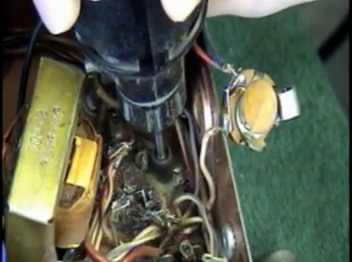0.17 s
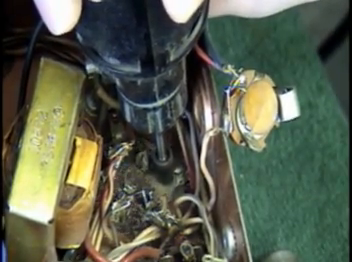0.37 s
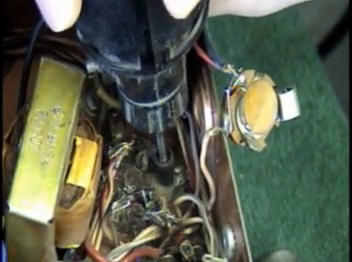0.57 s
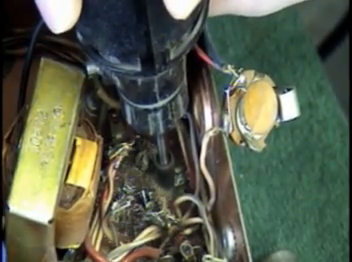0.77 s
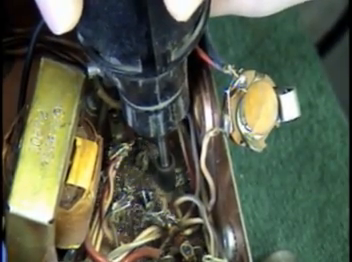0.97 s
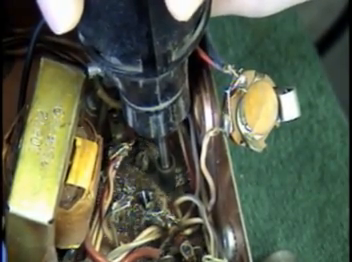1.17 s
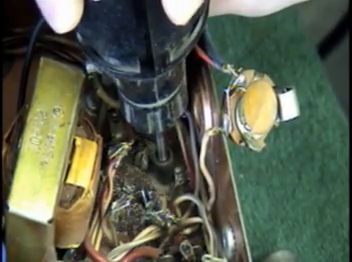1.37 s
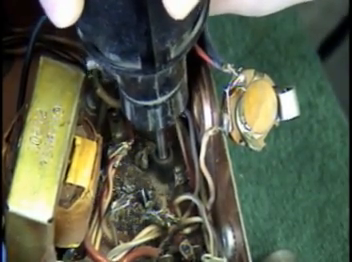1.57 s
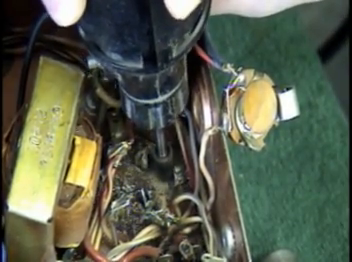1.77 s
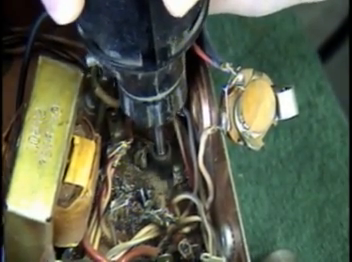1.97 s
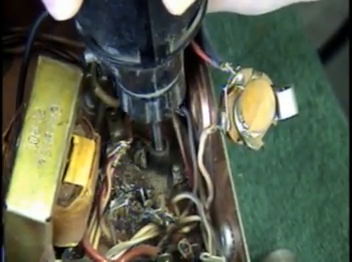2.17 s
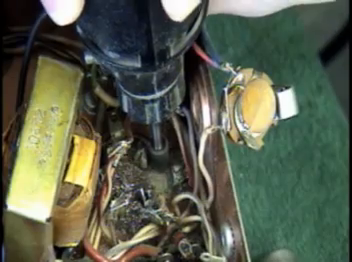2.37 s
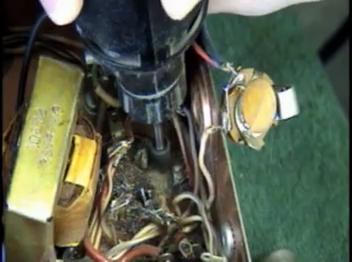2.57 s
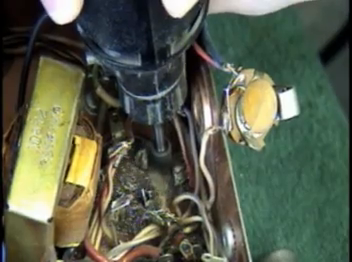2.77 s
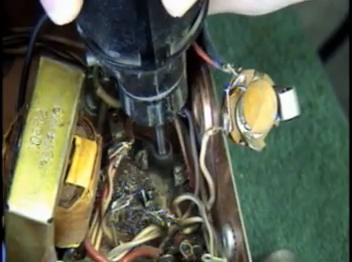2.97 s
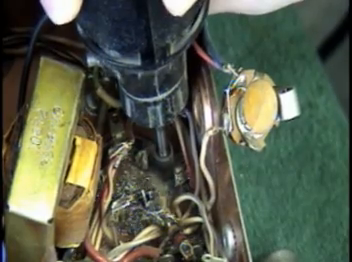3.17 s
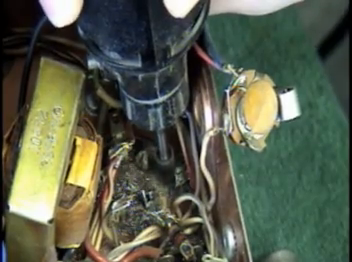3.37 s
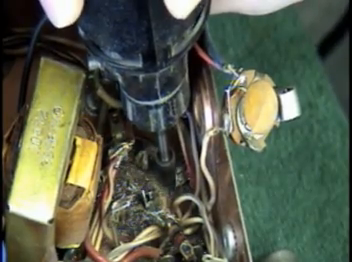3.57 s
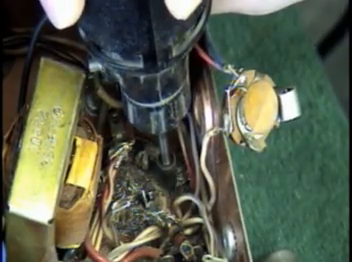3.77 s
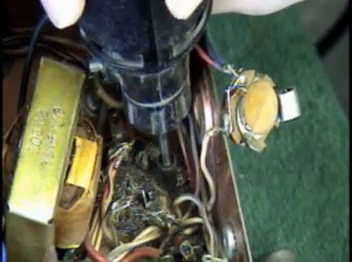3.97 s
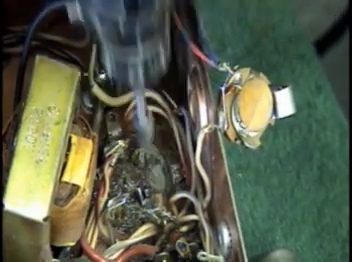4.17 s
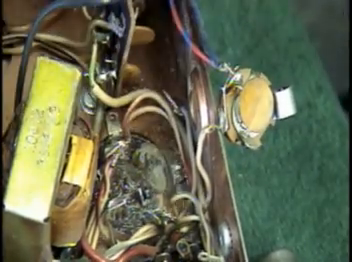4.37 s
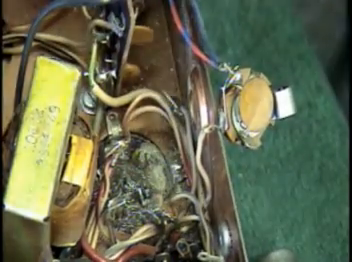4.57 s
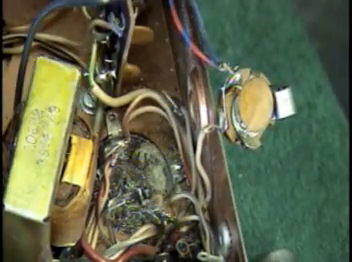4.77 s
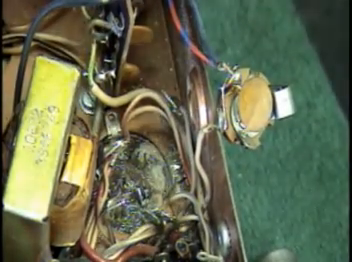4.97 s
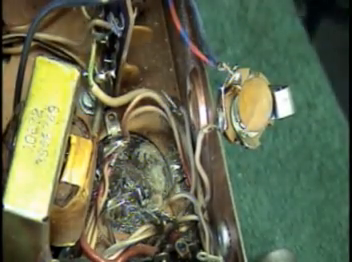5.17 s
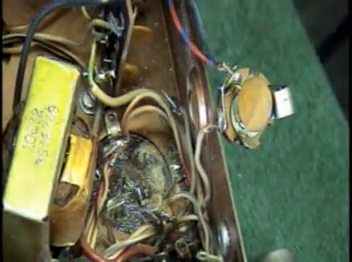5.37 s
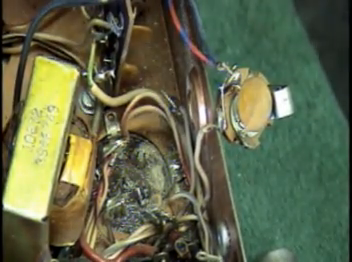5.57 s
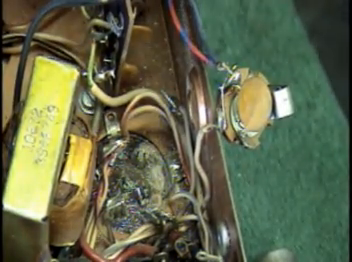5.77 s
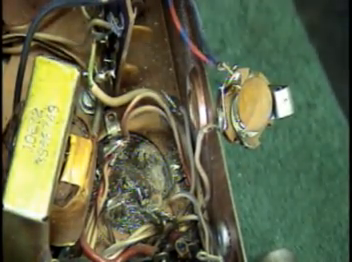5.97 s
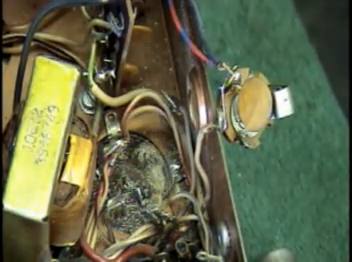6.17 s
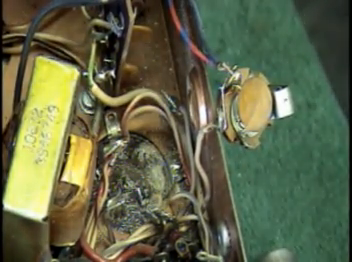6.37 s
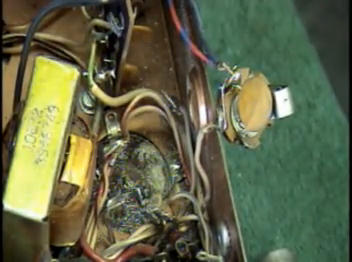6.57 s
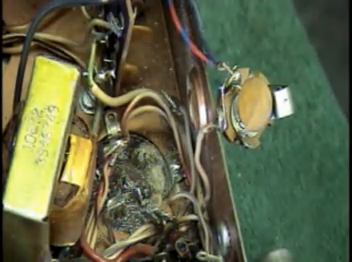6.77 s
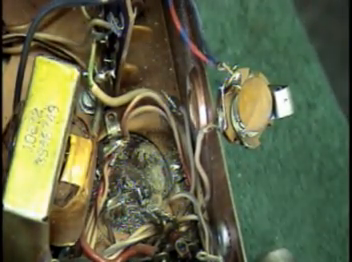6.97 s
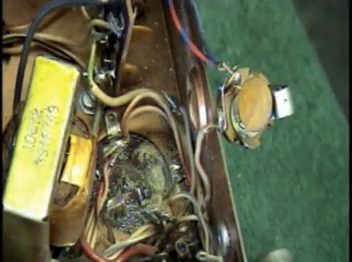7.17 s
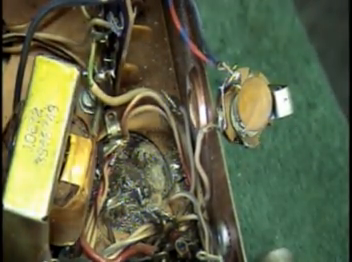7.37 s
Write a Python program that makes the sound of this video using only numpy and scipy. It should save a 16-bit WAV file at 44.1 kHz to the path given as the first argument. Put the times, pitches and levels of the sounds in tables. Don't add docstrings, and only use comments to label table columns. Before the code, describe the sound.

A handheld rotary tool grinds and buzzes against ringing metal, lifts off into a high free whine, runs down, and is laid on a bench with knocks.

```python
import sys
import numpy as np
from scipy import signal
from scipy.fft import rfft, irfft, next_fast_len
from scipy.io import wavfile
from scipy.ndimage import uniform_filter1d

SR = 44100
rng = np.random.default_rng(int(sys.argv[2]) if len(sys.argv) > 2 else 0)


def waveform_to_disk(signal):
    frames = np.transpose(np.atleast_2d(signal))
    scaled = np.clip(frames, -1, 1) * 32767
    samples = np.round(scaled).astype(np.int16)
    wavfile.write(sys.argv[1], SR, samples)


def field_ratio(decibels):
    return 10 ** (np.asarray(decibels, dtype=float) / 20)


N = 326761
T = np.arange(N) / SR

# t/s, turns f/Hz
SHAFT = [(0, 257.3), (.31, 251.4), (.47, 266.7), (.76, 283.2), (1.05, 308.3), (1.27, 316.6), (1.36, 331),
         (1.47, 309), (1.66, 313.1), (1.95, 345.4), (2.24, 352.6), (2.36, 332.1), (2.53, 315.8),
         (2.66, 289), (2.81, 274.8), (2.98, 285), (3.35, 282.3), (4.1, 313.2)]
LIFT_S, FREE_HZ, SPIN_UP_S = 4.125, 389.6, 0.078
OFF_S, BALANCE_HZ, BRAKE_PER_S = 4.81, 416.5, 0.4356

# t/s, pressure level/dB, dig of the flutes over the grit/dB, evenness of bite/dB, side load/dB
CUT = [(0, -26.5, -4, -0.5, -8), (.3, -27, -5, 0, 6), (.6, -27, -3, 0.5, -4), (.85, -28, -2, 3, -4),
       (1.15, -28.5, 0.5, -0.5, -2), (1.38, -28.5, 1, -1.5, 5), (1.55, -27.5, -11, 3, -10),
       (1.75, -29.5, -7.5, 0, 1.5), (1.92, -31, -4, -1, -7), (2.1, -31, -1, -1, 4),
       (2.35, -29.5, 4, -1, 4.5), (2.55, -27.5, 4, -3.5, 14), (2.72, -27, 0, 0.5, 8),
       (2.95, -27.5, -5.5, 1.5, 4.5), (3.35, -27, -6.5, 0.5, -0.5), (3.75, -28, -3, 3, -11),
       (4.0, -29, 3.5, -8.5, 1.5), (4.15, -35.5, 9.5, -8.5, 0)]
# t/s, strength level/dB, length/s
GRABS = [(1.035, -15, 0.022), (1.159, -15, 0.02), (1.365, -7.5, 0.032), (1.419, -11, 0.028),
         (1.949, -6.5, 0.028), (2.043, -7.5, 0.029), (2.52, -7, 0.0053), (2.576, -10.5, 0.0079),
         (2.665, -8.5, 0.0064), (3.833, -14, 0.0064), (3.9, -14, 0.018), (3.952, -7.5, 0.019),
         (4.025, -8, 0.031), (4.08, -10, 0.027), (4.138, -32, 0.021)]
# f/Hz, level per Hz/dB
CHASSIS = [(88, -66), (150, -29), (216, -56), (318, -34), (477, -33), (556, -24.5), (786, -22),
           (849, -13.5), (1940, -5.5), (3150, -1), (4200, -4), (7490, 6.5), (8090, 1.5), (13100, 1.5),
           (15000, -8.5)]
# f/Hz, width/Hz, level/dB
RINGS = [(1940, 130, -2.5), (2562, 40, -4), (3113, 48, -5.5), (4966, 690, 0.5), (6660, 18, 2.5),
         (7530, 50, 2), (9020, 49, 7), (8770, 36, -17), (12800, 54, -58)]
# order per turn, level/dB
LOBES = [(3, -51.5), (4, -48), (5, -49.5), (7, -45.5)]
# f/Hz, width/Hz, level/dB
PANEL = [(868, 70, 0), (1009, 120, 1), (1140, 57, 8), (1277, 39, 3.5), (1920, 170, 12), (2382, 130, 3),
         (3110, 69, -3), (3537, 81, 2)]
DIG_SHARE, DRUM_DB, DRUM_SHARE, EVEN_SHARE = 0.69, -9, 0.13, 0.4

# f/Hz, level per Hz/dB
HOUSING = [(180, -70), (300, -37), (365, -13.5), (647, -9), (1040, -6.5), (1490, -4.5), (1970, 0),
           (2360, -1), (3380, 5), (4180, 5.5), (7920, 11.5), (13800, 1.5), (15000, -8)]
# f/Hz, width/Hz, level/dB
CAVITY = [(1105, 149.4, 6.5), (3480, 280, -0.5), (9330, 820, -7)]
# order per turn, level/dB
SPIN = [(3, -12), (8, 8), (9, -8), (11, 3.5), (12, -0.5), (13, 5), (14, -3.5), (16, 8.5), (17, 2), (19, 1),
        (24, -10), (30, 4)]
# t/s, level/dB
RATTLE = [
    (4.2, -3.5),
    (4.8, -2.5),
    (5, 0),
    (5.6, -1),
    (6, -30),
]
# t/s, gain level/dB, left-right/dB
NEAR = [(4.17, -2.5, -1.5), (4.4, 2, -1.5), (4.7, 3, -2.5), (4.95, -0.5, -1.5), (5.2, -2.5, -1),
        (5.5, -2.5, -1.5), (5.9, 3, -2), (6.15, 1.5, -2), (6.4, 7, -3)]
NEAR_SHARE = 0.2
UNBALANCE_DB = -65
# f/Hz, width/Hz, level/dB
GRIP = [(332.3, 29, 10.5), (398, 23.6, 9), (279, 10, -0.5)]
BARS_LOADED_DB, BARS_FREE_DB = -39.5, -35
BARS_FLUTTER_DB, BARS_WEAR_DB, BARS_POWER = 0.8, 11, 4.3
SECOND_DB, SECOND_POWER = -51.5, 0.88
# f/Hz, width/Hz, level/dB
SECOND_RING = [(7790, 90, 13.2)]
HISS_DB, HISS_POWER, HOUSING_DB, HOUSING_POWER = -42, 0.61, -39, 1.77
SQUEAK_DB, SQUEAK_POWER, FIZZ_DB, FIZZ_POWER = -56, -0.39, -12.5, 0.84

# f/Hz, level/dB
DRUM = [(29.97, -67), (59.94, -70), (179.8, -78), (299.7, -80.5), (333, -79)]
# f/Hz, level/dB
HUM = [(119.88, -68), (239.76, -72.5), (359.64, -65.5), (479.5, -74), (719.3, -71.5), (839.2, -84),
       (959, -76), (1139, -79)]
# t/s, level/dB
SHADE = [
    (5.3, 0.5),
    (6.4, 6),
    (6.55, 5.5),
    (7.4, 9),
]
# ticks f/Hz, level/dB
COGS = [(95.785, 0), (95.3, -3)]
# f/Hz, level/dB
WHINE = [(1500, -92), (2900, -82.5), (4250, -89), (4550, -75.5), (4850, -83), (5750, -78), (7200, -77.5),
         (7500, -83), (7780, -69), (8200, -90), (10050, -82), (11000, -89), (13000, -94)]
# f/Hz, level per Hz/dB
FLOOR = [(4.7, -32), (8.0, -29), (118, -4.5), (289, -6), (359, -10.5), (419, -3), (475, -6), (647, -6.5),
         (967, -2), (1800, -11), (4140, -13.5), (7680, -11), (8430, -17), (10200, -17), (13000, -37)]
FLOOR_DB = -55.5

# t/s, peak level/dB, thump level/dB, t60/s, brightness f/Hz
KNOCKS = [
    (5.002, -26.5, -43, .06, 6200),
    (5.329, -37.5, -20, 0.25, 507),
    (5.881, -28.5, -27, 0.19, 800),
    (6.084, -36, -3, 0.16, 493),
    (6.135, -28, -23, 0.061, 2600),
    (6.17, -24.5, -7.5, 0.18, 1850),
    (6.22, -35.5, -16, 0.51, 1260),
    (6.292, -39.5, -1.5, 0.17, 420),
    (6.978, -37.5, -16, 0.25, 1480),
    (7.046, -36.5, -33, 0.033, 1300),
]
# t/s, left-right/dB
BENCH_PAN = [(5.9, 2.5), (7, -3)]
# f/Hz, level/dB, t60/s
BENCH = [(131, -15, .2), (194, 0.5, 0.27), (302, 1, 0.094), (440, -2, 0.2), (517, 3.5, 0.13),
         (660, 1, 0.25)]
# f/Hz, level/dB, t60/s
SHELL = [(1050, -9.5, 0.085), (1850, -5, 0.084), (1890, -10, 0.058), (2424, -7, 0.055), (3730, -6, 0.043)]
# t/s, level/dB, f/Hz, length/s
CREAK = (6.475, -60, 4330, .035)

# f/Hz, left-right/dB
LEAN = [(60, 0.0), (110, 6), (200, -2), (370, 0.5), (690, 1.5), (1270, 2), (2330, 4.5), (4290, -0.5),
        (7900, 1), (14500, 2.5)]
# f/Hz, side over middle/dB
WIDE = [(60, -27), (110, -14), (200, -15), (370, -11), (690, -13), (1270, -10), (2330, -10), (4290, -10.5),
        (7900, -9), (14500, -16)]
# f/Hz, t60/s
SHOP = [(200, 0.15), (2000, 0.24), (10000, 0.47)]
# above f/Hz, needed level/dB
CEILING = [(14550, -32.5), (13900, -45), (13100, -50)]


def unit(x):
    return x / np.sqrt(np.mean(x ** 2) + 1e-20)


def along(points, hz):
    f, v = np.transpose(points)
    return np.interp(np.log(hz + 1), np.log(f + 1), v)


def curves(rows):
    s, *cols = np.transpose(rows)
    return [np.interp(T, s, c) for c in cols]


def wobble(rate, shape=np.asarray):
    knots = shape(rng.standard_normal(int(N * rate / SR) + 4))
    return np.interp(T * rate, np.arange(len(knots)), knots)


def filtered(x, response):
    m = next_fast_len(N + SR // 2)
    return irfft(rfft(x, m) * response(np.fft.rfftfreq(m, 1 / SR)), m)[..., :N]


def split(x, edges_hz):
    lows = [filtered(x, lambda f: 1 / (1 + (f / e) ** 6)) for e in edges_hz]
    return [unit(b) for b in np.diff([0 * x, *lows, x], axis=0)]


def peaks(modes):
    return lambda f: 1 + sum(field_ratio(db) / (1 + (2 * (f - c) / w) ** 2) for c, w, db in modes)


def teeth(turns, first, count, drift, depth_db, favoured=()):
    extra_db = {round(k): db for k, db in favoured}
    phase = (2 * np.pi * (turns % 1)).astype(np.float32)
    total = 0
    for k in range(round(first), count + 1):
        strength = wobble(drift, lambda z: field_ratio(depth_db * z + extra_db.get(k, 0)))
        shift = np.float32(wobble(drift, lambda z: 1.3 * z + k * k))
        total = total + strength * np.sin(k * phase + shift)
    return unit(total)


def shaft():
    loaded, = curves(SHAFT)
    climbing = FREE_HZ - (FREE_HZ - loaded) * np.exp(-np.maximum(T - LIFT_S, 0) / SPIN_UP_S)
    angle = np.arctan(FREE_HZ / BALANCE_HZ) - BRAKE_PER_S * (T - OFF_S)
    coasting = BALANCE_HZ * np.tan(np.maximum(angle, 0.01))
    return np.where(T < OFF_S, climbing, coasting)


def cutter(turns, speed):
    press_db, dig_db, even_db, _ = curves(CUT)
    dig_db = dig_db + 1.9 * wobble(20)
    cut_db, grit_db = press_db + DIG_SHARE * dig_db, -dig_db
    drum_db = DRUM_DB - DRUM_SHARE * dig_db + 2 * wobble(10)
    steady_db = even_db + 0.59 * wobble(8)
    favoured = [(2, 0), (3, -32), (4, 3.5), (5, -0.5), (7, -11.5), (10, -9.5)]  # order, dB
    bite = teeth(turns, 2, count=40, drift=21, depth_db=4.5, favoured=favoured)
    bite = filtered(bite, lambda f: 1 / (1 + (f / 5500) ** 2))
    gate = 1 + 0.1 * np.cos(2 * np.pi * turns) + 0.35 * np.cos(4 * np.pi * turns)
    chips = rng.standard_normal(N) * field_ratio(1.9 * np.minimum(rng.exponential(size=N), 4))
    force = field_ratio(steady_db) * 1.1 * bite + unit(gate * chips) * field_ratio(1.3 * wobble(30))

    grabbed = rng.standard_normal(N) + field_ratio(steady_db) * bite
    for s, db, length in GRABS:
        u = np.arange(SR // 8) / SR / length
        here = slice(round(s * SR), round(s * SR) + len(u))
        force[here] += field_ratio(db + 22.0) * u * np.exp(-u * u * 2) * grabbed[here]
    force /= np.sqrt(uniform_filter1d(force ** 2, size=SR // 3))

    ringing = filtered(force, lambda f: field_ratio(along(CHASSIS, f)) * peaks(RINGS)(f))
    low, mid, high = split(ringing, (1500, 4200))
    lobes = 0
    for k, db in LOBES:
        lobe_db = db + 2.5 + 3.03 * wobble(29.99) + 0.53 * wobble(5.5) + EVEN_SHARE * even_db
        wave = np.sin(2 * np.pi * round(k) * turns + 1.12 * wobble(12))
        lobes = lobes + field_ratio(lobe_db) * peaks(PANEL)(k * speed) * wave
    touching = np.clip((4.16 - T) / 0.006, 0, 1)
    return touching * (lobes + field_ratio(cut_db) * (field_ratio(drum_db - 2) * low + mid + field_ratio(grit_db) * high))


def motor(turns, speed):
    near_db, free = curves(NEAR)[0], np.clip((T - LIFT_S) / 0.03, 0, 1)
    slow_db = 20 * np.log10(speed / FREE_HZ)
    even_db, side_db = curves(CUT)[2:]

    unbalance = field_ratio(UNBALANCE_DB + side_db + 2.5 * wobble(9)) * peaks(GRIP)(speed)
    lines = unbalance * np.clip(speed / 250, 0, 1) ** 4 * np.sin(2 * np.pi * turns)
    loaded_db = BARS_LOADED_DB + EVEN_SHARE * even_db + 2.1 * wobble(14)
    flutter_db = BARS_FLUTTER_DB + BARS_WEAR_DB * (1 - speed / FREE_HZ)
    free_db = BARS_FREE_DB + BARS_POWER * slow_db + flutter_db * wobble(14)
    bars = (1 - free) * field_ratio(loaded_db) * peaks(PANEL)(10 * speed)
    bars += free * peaks(CAVITY)(10 * speed) * field_ratio(free_db)
    lines += bars * field_ratio(3 + (3.5 - 2 * free) * wobble(30)) * np.sin(20 * np.pi * turns)
    octave = field_ratio(SECOND_DB + SECOND_POWER * slow_db + 1.55 * wobble(27)) * peaks(SECOND_RING)(20 * speed)
    lines += free * octave * np.sin(40 * np.pi * turns)

    rattle = field_ratio(curves(RATTLE)[0]) * teeth(turns, 2, count=64, drift=20, depth_db=5.5, favoured=SPIN)
    rattle = filtered(rattle, lambda f: 0.4 + 0.6 / (1 + (3500 / (f + 1)) ** 4))
    pulse = 1 + 0.16 * np.cos(2 * np.pi * turns)
    air = unit(rng.standard_normal(N) * field_ratio(0.9 * wobble(12)) * pulse)
    housed = filtered(air + rattle, lambda f: field_ratio(along(HOUSING, f)) * peaks(CAVITY)(f))
    low, high, fizz = split(housed, (3500, 11500))
    squeak = unit(filtered(air, lambda f: 1 / (1 + ((f - 5250) / 250) ** 2)))
    blown = field_ratio(HOUSING_DB + HOUSING_POWER * slow_db - (1 - NEAR_SHARE) * near_db) * low
    hiss = high + field_ratio(FIZZ_DB + FIZZ_POWER * slow_db) * fizz
    blown += field_ratio(HISS_DB + HISS_POWER * slow_db) * hiss
    blown += field_ratio(SQUEAK_DB - 11.0 + SQUEAK_POWER * slow_db) * squeak
    turning = np.clip(speed / 60 - 0.3, 0, 1)
    return lines + turning * field_ratio(near_db) * blown


def transport():
    k, out = np.arange(4097), 0
    for hz, db in COGS:
        size = field_ratio(db + along(WHINE, k * hz) + rng.normal(0, 1.0, len(k)))
        size = size * (k * hz > 1800) * (k * hz < 13000)
        cycle = irfft(size * np.exp(2j * np.pi * rng.random(len(k)))) * (len(k) - 1)
        place = (hz * T + 0.0043 * wobble(3.3)) % 1
        out = out + np.interp(place, np.arange(len(cycle)) / len(cycle), cycle)
    return out


def hum(lines, depth_db):
    return sum(field_ratio(db + depth_db * wobble(6.9)) * np.sin(2 * np.pi * (hz * T + rng.random()))
               for hz, db in lines)


def camcorder():
    a, b = unit(filtered(rng.standard_normal((2, N)), lambda f: field_ratio(along(FLOOR, f))))
    side = filtered(b, lambda f: field_ratio(along(WIDE, f) + 14.0) * f / (f + 300))
    hiss = field_ratio(FLOOR_DB - 6.5) * np.array([a + side, a - side])
    lamp = field_ratio(curves(SHADE)[0] - 3) * hum(HUM, depth_db=-2.0) * field_ratio([[-0.8], [0.8]])
    whine = field_ratio(3.5 + 0.4 * wobble(6.6)) * transport() * field_ratio([[-1.5], [1.5]])
    return field_ratio(2.5) * hum(DRUM, depth_db=3.0) + lamp + whine + hiss


def knocks():
    out, t = np.zeros((2, N + SR)), np.arange(SR // 2) / SR

    def ring(modes):
        return sum(field_ratio(db + rng.normal(0, 0.95) - 60 * t / t60) * np.sin(2 * np.pi * hz * t)
                   for hz, db, t60 in modes)

    def band(lo_hz, hi_hz):
        sos = signal.butter(2, [lo_hz, hi_hz], "band", fs=SR, output="sos")
        return unit(signal.sosfilt(sos, rng.standard_normal(len(t))))

    for s, db, thump_db, t60, bright_hz in KNOCKS:
        pan_db = np.interp(s, *np.transpose(BENCH_PAN))
        tick = 0.5 * band(500, min(bright_hz * 3.9, 9000)) * field_ratio(-60 * t / 0.017)
        scrape = 0.28 * band(bright_hz / 1.38, min(bright_hz * 2.03, 8000)) * field_ratio(-60 * t / abs(t60))
        boom = 0.31 * ring(BENCH) + 0.58 * band(79, 540) * field_ratio(-60 * t / 0.43)
        body = 1.7 * min(bright_hz / 1800, 1) * ring(SHELL)
        hit = tick + scrape + field_ratio(thump_db) * (body + 1.16 * boom)
        hit = hit * (1 - np.exp(-t / 0.00074))
        out[:, round(s * SR):][:, :len(t)] += field_ratio(db + np.array([[pan_db], [-pan_db]]) / 2) * hit
    return out[:, :N] + creak()


def creak():
    s, db, hz, length = CREAK
    swell = np.sin(np.pi * np.clip((T - s) / length, 0, 1))
    return field_ratio(db) * np.sin(2 * np.pi * hz * T + 1.04 * wobble(150)) * swell


def tail(t60_of, seconds):
    hz, t, z = signal.stft(rng.standard_normal((2, int(SR * seconds))), SR, nperseg=256)
    answer = signal.istft(z * field_ratio(-60 * t / along(t60_of, hz)[:, None]), SR, nperseg=256)[1]
    return answer / np.linalg.norm(answer[0])


def scene():
    speed = shaft()
    turns = np.cumsum(speed) / SR
    tool = cutter(turns, speed) + motor(turns, speed)
    near = signal.fftconvolve(tool, tail([(300, 0.013), (8000, 0.27)], 0.1)[0])[:N]
    near *= 1.05 + 1.05 * wobble(38)
    side = filtered(near, lambda f: field_ratio(along(WIDE, f) - 5.0))
    halves = np.array([[0.5], [-0.5]])
    pair = filtered(np.array([tool + side, tool - side]), lambda f: field_ratio(along(LEAN, f) * halves))
    dry = pair * field_ratio(curves(NEAR)[1] * halves) + knocks()
    shop = signal.fftconvolve(dry, tail(SHOP, 0.4), axes=1)[:, :N]
    return dry + field_ratio(-11) * shop + camcorder()


def roll_off(x):
    return signal.sosfilt(signal.butter(12, 15140, fs=SR, output="sos"), x)


def record(dry):
    level_db = 10 * np.log10(np.abs(uniform_filter1d(dry[0] ** 2, size=SR // 25)) + 1e-12)
    for hz, need_db in CEILING:
        quiet = uniform_filter1d((level_db < need_db) * 1.0, size=SR // 50)
        dry = dry - quiet * filtered(dry, lambda f: f > hz)
    return roll_off(dry)


dry = scene()
out = record(dry)
waveform_to_disk(out)
```